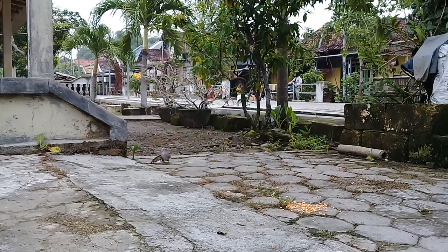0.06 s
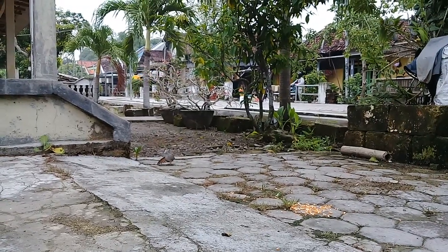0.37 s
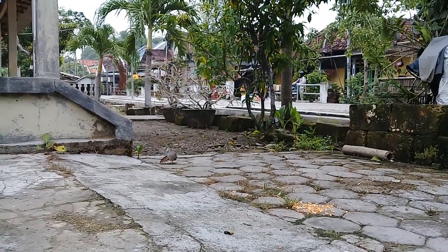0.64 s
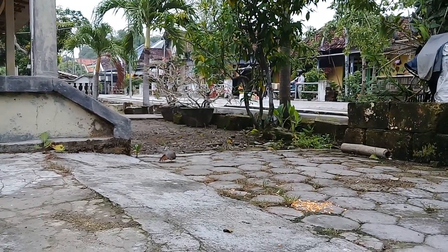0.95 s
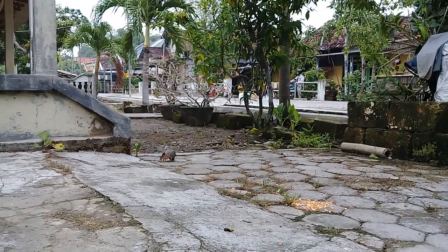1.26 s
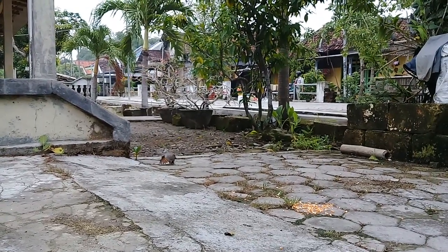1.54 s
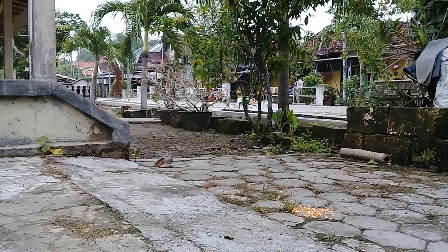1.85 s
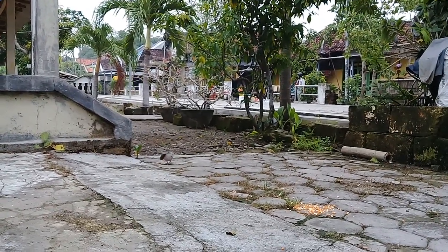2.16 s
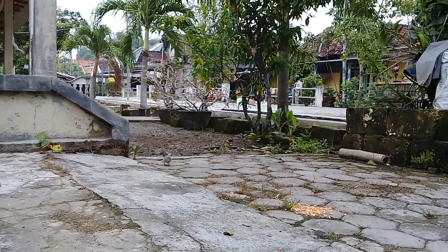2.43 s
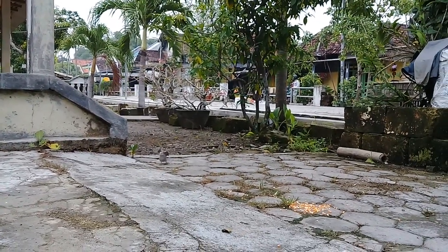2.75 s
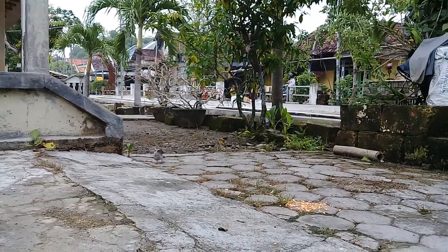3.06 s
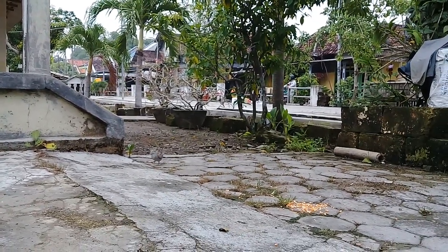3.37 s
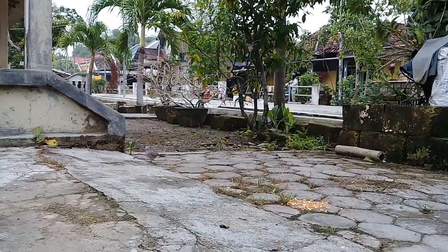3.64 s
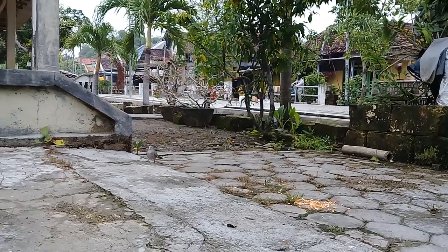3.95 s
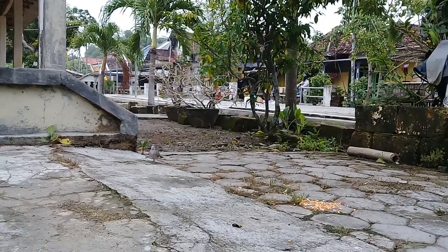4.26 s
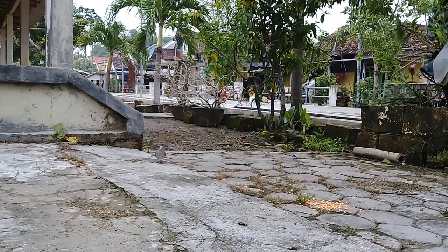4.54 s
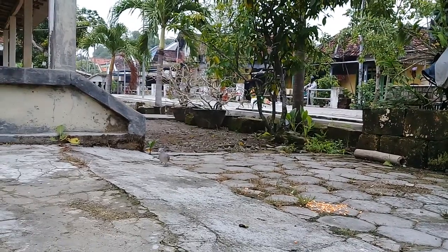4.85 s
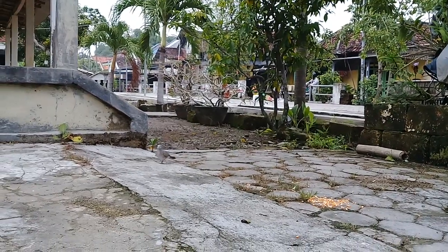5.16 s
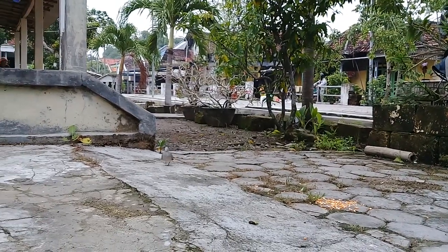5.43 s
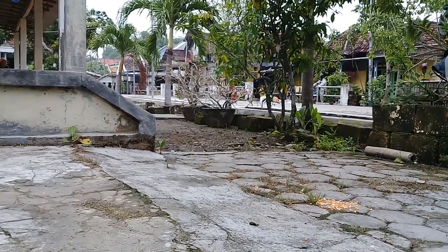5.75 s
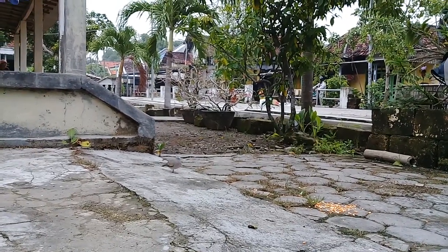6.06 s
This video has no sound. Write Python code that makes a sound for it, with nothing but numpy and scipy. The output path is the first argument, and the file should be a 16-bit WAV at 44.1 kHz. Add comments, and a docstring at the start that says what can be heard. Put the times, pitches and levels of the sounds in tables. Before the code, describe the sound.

A distant motorbike starts and throbs at idle beneath peeping chicks, dove coos, a small bird's chatter and a few dull scrubbing strokes.

```python
"""A village yard. From the start, chicks peep in falling glides over a low rumble and far birds and leaves.
A light knock sounds; after a second a single-cylinder motorbike starts some way off and idles, its
firings driving the silencer's resonance in a low throb. A zebra dove coos; then a small bird chatters
and friction excites a dull body in even scrubbing strokes. Near the end come thin whistles, the dove
again and rough warbles. Reflections from walls and paving give the calls and strokes a short echo."""
import sys
import numpy as np
from scipy import signal
from scipy.io import wavfile

SR = 44100
rng = np.random.default_rng(int(sys.argv[2]) if len(sys.argv) > 2 else 0)


def unload_wav(signal):
    """Save mono or channel-first audio to the path in sys.argv[1] as 16-bit WAV at rate SR, clipped to [-1, 1]."""
    wavfile.write(
        sys.argv[1],
        SR,
        np.round(np.clip(np.atleast_2d(signal).T, -1, 1) * 32767).astype(np.int16),
    )


N = 277830
TIME = np.arange(N) / SR


# Engine speed. Each row: time in seconds, firings per second.
FIRING_RATE = [(1.22, 13.22), (1.37, 16.88), (2.65, 17.51), (3.3, 16.99), (3.7, 17.64), (4.05, 16.95),
               (4.45, 17.44), (6.3, 17.78)]
# The silencer's response. Each row: frequency in Hz, gain in dB.
SILENCER_RESPONSE = [(52, -33), (69, -28), (84, -3), (99, -0.5), (108, 0), (120, -10.5), (139, -25),
                     (156, -18.5), (173, -30), (191, -19.5)]
# Mechanical noise. Each row: frequency in Hz, relative spectral density in dB.
ENGINE_SPECTRUM = [(70, 13), (120, 9.5), (180, -3.5), (300, -4), (480, -4.5), (780, -31), (1250, -18.5),
                   (1900, -17), (2400, -42.5), (3400, -12), (5500, -19), (7500, -59), (9000, -77),
                   (15000, -42.5)]
# Modes of the engine casing. Each row: frequency in Hz, bandwidth in Hz, relative level in dB.
CASING_MODES = [(587, 61.5, -62.5), (1014.5, 55, -71.5)]

def motorbike(boom_db=-44, noise_db=-54, casing_db=-0.5, first_firing_s=1.112, slow_idle_hz=16.86):
    """Forced resonance: harmonics of the firing rate boom in the silencer near 100 Hz; the casing rattles."""
    firing_hz, = in_time(FIRING_RATE)
    cycles = np.cumsum(firing_hz) / SR
    phase = 2 * np.pi * (cycles - np.interp(first_firing_s, TIME, cycles))
    exhaust = 0
    for order in range(4, 12):
        db = boom_db + np.interp(order * firing_hz, *np.transpose(SILENCER_RESPONSE))
        slip = 0
        if order == 5:  # this order makes the throb; it weakens as the engine speeds up
            db = db - 10 * np.maximum(firing_hz - slow_idle_hz, 0)
        elif order != 6:  # the weak orders waver in level and phase
            db = db + 0.8 * drift(5)
            slip = 0.3 * drift(5)
        exhaust = exhaust - np.sqrt(2) * from_db(db) * np.cos(order * phase + slip)
    rattle = from_db(noise_db) * coloured_noise(ENGINE_SPECTRUM, flicker_db=2.5)
    rattle += from_db(casing_db) * ringing_noise(CASING_MODES)
    unevenness = from_db(-0.35 * drift(21))
    puffs = 1 + 0.064 * np.cos(phase)
    return spin_up() * (exhaust * unevenness + rattle * puffs)


def spin_up(start_s=1.042, rise_s=0.37):
    """The engine's amplitude envelope: a linear rise from 0 at rest to 1 at idle."""
    return np.clip((TIME - start_s) / rise_s, 0, 1)


# Chicks near the house. Each row: start of the fall in seconds, its length in seconds,
# top pitch in Hz, relative level in dB.
CHICK_PEEPS = [(0.077, 0.11, 5770, -63), (0.084, 0.092, 4260, -74.5), (0.246, 0.034, 4300, -66),
               (0.392, 0.11, 5640, -59), (0.403, 0.031, 4200, -65), (0.546, 0.042, 5290, -56),
               (0.667, 0.12, 5620, -60.5), (0.964, 0.11, 5680, -59), (1.1, 0.057, 4700, -64.5),
               (1.272, 0.12, 5800, -60.5), (1.274, 0.029, 4370, -60), (1.456, 0.032, 4370, -56),
               (1.601, 0.09, 5650, -58), (1.962, 0.076, 5080, -56.5), (2.153, 0.08, 5060, -55),
               (2.749, 0.081, 5070, -55), (2.925, 0.087, 4850, -58.5), (3.425, 0.019, 3750, -54),
               (3.49, 0.048, 4070, -57.5), (3.664, 0.039, 4370, -52), (4.126, 0.027, 4380, -65),
               (4.383, 0.094, 5340, -56), (4.754, 0.029, 4100, -58), (5.121, 0.029, 4400, -63),
               (5.272, 0.026, 4300, -60.5), (5.462, 0.11, 5630, -63.5), (5.649, 0.053, 4750, -56),
               (5.835, 0.027, 4300, -53), (6.059, 0.107, 5650, -63)]

def chicks(level_db=-0.8, flare_hz=4050, flare_width_hz=220, ground_dip_hz=4550, echo_s=0.011):
    """Interference and resonance: falling peeps dip, then flare and ring at a resonance near 4 kHz."""
    peeps, echo = np.zeros((2, N))
    for s, length, top_hz, db in CHICK_PEEPS:
        note = from_db(db + level_db) * peep(length, top_hz)
        start = s - PEEP_HOLD * length
        add(peeps, start, note)
        paving_lag_s = rng.uniform(.0008, .003)  # the bounce off the paving ripples the glide
        add(peeps, start + paving_lag_s, 0.4 * note)
    flare = 1.16 * resonate(peeps, flare_hz, flare_width_hz)
    peeps = peeps + flare - resonate(peeps, ground_dip_hz, 400)
    ring = from_db(-8) * resonate(peeps, flare_hz, flare_width_hz)
    add(echo, echo_s, from_db(-13) * peeps + ring)
    return yard(peeps + echo, wet_db=-8)


PEEP_HOLD = 0.17  # time on the top note, as a share of the fall's length

def peep(length, top_hz, end_hz=2800, attack_share=0.44, swell_db=4.5, uneven_db=1.5):
    """A frequency glide: the tone holds its top note, then falls ever faster, swelling unevenly."""
    progress = np.arange(-PEEP_HOLD * length, length, 1 / SR) / length
    hz = top_hz - (top_hz - end_hz) * np.maximum(progress, 0) ** 1.42
    attack = np.clip((progress + PEEP_HOLD) / attack_share, 0, 1)
    release = np.clip((1 - progress) / (2.34 * length), 0, 1)  # long peeps fade higher up the glide
    fade = np.sin(np.pi / 2 * attack * release) ** 2
    uneven = np.interp(TIME[:len(hz)] * 60.5, np.arange(40), rng.standard_normal(40))
    return fade * from_db(swell_db * (progress - .5) + uneven_db * uneven) * voice(hz, waver=0.008)


# The dove's phrases. Each row: start in seconds, gain in dB.
DOVE_PHRASES = [(2.23, -1), (5.483, 1.5)]
# Downward flicks within the coo. Each row: delay into the phrase in seconds, relative level in dB.
DOVE_FLICKS = [(0.249, -58), (0.372, -60)]

def dove(pip_hz=902, pip_db=-55, coo_after_s=0.039):
    """Nearly pure tones reverberate among the houses: a low pip, then a held coo with two quick flicks."""
    pips, coos = np.zeros((2, N))
    for s, phrase_db in DOVE_PHRASES:
        gain = from_db(phrase_db)
        add(pips, s, gain * from_db(pip_db) * whistle(0.052, pip_hz, pip_hz, waver=0.017))
        add(coos, s + coo_after_s, gain * coo())
        for delay, db in DOVE_FLICKS:
            flick = whistle(0.0294, from_hz=1070, to_hz=864, waver=0.02)
            add(pips, s + delay, gain * from_db(db) * flick)
    return yard(pips, wet_db=-7) + yard(coos, wet_db=-2, t60_s=1.5)


def coo(length_s=0.5, start_hz=1180, sag_hz_per_s=270, flutter_hz=26.84, swell_db=11, fade_db_per_s=7.5):
    """Joint frequency and amplitude modulation: a sagging note, clear as it swells, then fluttering."""
    t = TIME[:int(length_s * SR)]
    swell = np.exp(-((t - 0.087) / 0.032) ** 2)
    flutter_rate = flutter_hz * (1 + 0.25 * drift(13)[:len(t)])
    flutter = (1 - swell) * np.sin(2 * np.pi * np.cumsum(flutter_rate) / SR)
    hz = (start_hz - sag_hz_per_s * t) * (1 + 0.041 * flutter)
    strength = from_db(-63 + swell_db * swell - fade_db_per_s * t) * (1 + 0.17 * flutter)
    return strength * signal.windows.tukey(len(t), .1) * voice(hz, waver=0.0079)


# Scrubbing strokes. Each row: start in seconds, length in seconds, level in dB.
SCRUB_STROKES = [(2.925, 0.14, -53), (3.609, 0.17, -51.5), (4.264, 0.2, -55), (4.996, 0.16, -50.5),
                 (5.687, 0.18, -52)]
# Modes of the scrubbed body. Each row: frequency in Hz, bandwidth in Hz, relative level in dB.
SCRUBBED_MODES = [(248, 24, 2), (281, 85, 2.5), (437, 210, 3), (970, 420, -10.5)]

def scrubbing(grain_db=1.25):
    """Frictional excitation: each stroke grips unevenly and drives the modes of a dull body."""
    force = bursts(SCRUB_STROKES, taper=0.59) * from_db(grain_db * drift(55))
    return yard(force * rms_one(ringing_noise(SCRUBBED_MODES)), wet_db=-4)


# The two tones of a chip. Each row: starting pitch in Hz, final pitch in Hz, relative level in dB.
CHIP_GLIDES = [(5330, 5150, -5.5), (4320, 3500, 1.5)]

def chatter(start_s=2.832, count=22, gap_s=0.0614, slowing_s=0.00164, rasp_db=-61.5, chip_db=-65):
    """Tone plus noise: a small bird's slowing run of chips, each two sinking glides and a pulse of rasp."""
    rasp_envelope, chips = np.zeros((2, N))
    age = TIME[:SR // 10] / 0.0068  # the rasp peaks at age 1
    s = start_s
    for k, uneven_db in enumerate(rng.standard_normal(count)):
        add(rasp_envelope, s, from_db(rasp_db + uneven_db) * age * np.exp(1 - age))
        for from_hz, to_hz, tone_db in CHIP_GLIDES:
            tone = whistle(0.0203, from_hz, to_hz, waver=0.018)
            add(chips, s, from_db(chip_db + uneven_db + tone_db) * tone)
        s += gap_s + slowing_s * k
    rasp = ringing_noise([(3990, 220, 1.0), (5230, 750, -0.5), (7240, 170, -15.5)])
    return yard(rasp_envelope * rasp + chips, wet_db=-8)


# Throaty notes. Each row: start in seconds, length in seconds, centre pitch in Hz, relative level in dB.
WARBLE_NOTES = [(0.636, 0.073, 4204, -62.5), (2.868, 0.018, 3610, -55), (6.107, 0.11, 3006, -60.5),
                (6.221, 0.066, 3020, -51.5)]

def warbles(level_db=-1, swing_hz=19, swing_depth=0.0884):
    """Frequency modulation: a fast swing about a centre pitch roughens the notes of birds further off."""
    notes = np.zeros(N)
    for s, length, centre_hz, db in WARBLE_NOTES:
        t = TIME[:int(length * SR)]
        hz = centre_hz * (1 + swing_depth * np.cos(2 * np.pi * swing_hz * t))
        add(notes, s, from_db(db + level_db) * signal.windows.tukey(len(t), .4) * voice(hz, waver=0.0536))
    return yard(notes, wet_db=0)


# Thin whistles. Each row: start in seconds, length in seconds, level in dB.
HIGH_NOTES = [(5.044, 0.085, -73), (5.673, 0.1, -67.5), (6.199, 0.09, -65.5)]

def high_whistles(top_hz=5650, drop_hz=620):
    """Parabolic glides: each thin note lingers near its top pitch, then bends down a little."""
    notes = np.zeros(N)
    for s, length, db in HIGH_NOTES:
        hz = top_hz - drop_hz * np.linspace(0, 1, int(length * SR)) ** 2
        add(notes, s, from_db(db) * signal.windows.tukey(len(hz), .5) * voice(hz, waver=0.011))
    return yard(notes, wet_db=-5)


# The impact. Each row: start in seconds, relative peak level in dB.
IMPACTS = [(.459, -49.5)]
# Modes of the struck body. Each row: frequency in Hz, bandwidth in Hz, relative level in dB.
STRUCK_MODES = [(530, 134, -2.5), (740, 180, -20), (1140, 590, -22), (1650, 220, -15.5), (1910, 350, -18)]

def knock(attack_s=0.0012, t60_s=0.12):
    """Damped vibration: after a light knock across the yard, broad modes decay exponentially."""
    envelope, t = np.zeros(N), TIME[:SR // 2]
    for s, peak_db in IMPACTS:
        add(envelope, s, from_db(peak_db - 60 * t / t60_s) * np.minimum(t / attack_s, 1))
    return yard(envelope * ringing_noise(STRUCK_MODES), wet_db=-4)


def high_fizz(level_db=-81, swell_db=3, lag_s=0.25):
    """Band-limited noise: a thin fizz near 7 kHz sets in just after the engine, and swells and ebbs."""
    band_pass = signal.butter(6, [6700, 7950], "band", fs=SR, output="sos")
    fizz = rms_one(signal.sosfilt(band_pass, rng.standard_normal(N)))
    onset = np.interp(TIME - lag_s, TIME, spin_up())
    return fizz * from_db(level_db + swell_db * drift(0.4)) * onset


# Spectra of the village air, the trees and a rustle.
# Each row: frequency in Hz, relative spectral density in dB.
AIR_SPECTRUM = [(25, -21), (50, -8.5), (85, 2), (150, -4.5), (250, -10.5), (500, -27.5), (900, -31.5),
                (2400, -37), (7000, -50.5), (15500, -50)]
TREES_SPECTRUM = [(2300, -63), (2900, -5), (3500, 6), (4100, 9), (4650, -1), (5400, -1.5), (6400, -43)]
RUSTLE_SPECTRUM = [(800, 6), (1200, 9.5), (2100, -1), (3000, 5), (6000, -6), (11000, -37)]
# The wash from the trees. Each row: time in seconds, relative level in dB.
TREES_LEVEL = [(0, -63), (.33, -74.5), (.65, -60), (1.35, -74), (2.3, -66), (3.7, -60), (4.6, -60.5),
               (6.3, -66.5)]
# The rustle. Each row: start in seconds, length in seconds, level in dB.
RUSTLE_BURSTS = [(2.677, 0.556, -61)]

def surroundings(air_db=-57, rise_db=2.5, rise_s=2.2, trees_db=-3.5):
    """Incoherent sources merge into noise: village rumble, far birds and leaves, one soft rustle."""
    air_gain = from_db(air_db + rise_db * np.minimum(TIME / rise_s, 1))
    air = air_gain * coloured_noise(AIR_SPECTRUM, flicker_db=3)
    trees = from_db(in_time(TREES_LEVEL)[0] + trees_db) * coloured_noise(TREES_SPECTRUM, flicker_db=5)
    rustle = bursts(RUSTLE_BURSTS, taper=0.6) * coloured_noise(RUSTLE_SPECTRUM, flicker_db=1.5)
    return air + trees + rustle


def yard(x, wet_db, t60_s=0.69):
    """Reverberation: scattered reflections from walls, trunks and paving follow the direct sound."""
    t = TIME[:SR]
    reflections = rng.standard_normal(SR) * (rng.random(SR) < 1500 / SR)  # about 1500 a second
    response = reflections * (t > .006) * from_db(-60 * t / t60_s)
    return x + from_db(wet_db) * signal.fftconvolve(x, response / np.linalg.norm(response))[:N]


def whistle(length, from_hz, to_hz, waver):
    """A linear glide that fades in and out."""
    hz = np.linspace(from_hz, to_hz, int(length * SR))
    return signal.windows.tukey(len(hz), 0.45) * voice(hz, waver)


def voice(hz, waver):
    """Jitter and shimmer: a bird's pure tone wavers in pitch and strength along its path; rms about 1."""
    knots_s = np.arange(300) / 330
    jitter, shimmer = [np.interp(TIME[:len(hz)], knots_s, row) for row in rng.standard_normal((2, 300))]
    phase = 2 * np.pi * np.cumsum(hz * (1 + waver * jitter)) / SR
    return np.sqrt(2) * from_db(2 * shimmer) * np.sin(phase)


def resonate(x, hz, width_hz):
    """A two-pole resonator with unit gain at its peak."""
    r = np.exp(-np.pi * width_hz / SR)
    feedback = [1, -2 * r * np.cos(2 * np.pi * hz / SR), r * r]
    return signal.lfilter(np.array([1, 0, -1]) * (1 - r * r) / 2, feedback, x + 1e-18)


def ringing_noise(modes):
    """Random excitation of modes, each given as frequency in Hz, bandwidth in Hz and rms level in dB."""
    total = 0
    for hz, width, db in modes:
        once = resonate(rng.standard_normal(N), hz, 1.5 * width)
        total = total + from_db(db) * rms_one(resonate(once, hz, 1.5 * width))  # twice, for steep skirts
    return total


def coloured_noise(spectrum, flicker_db):
    """Spectral shaping: noise in third-octave bands, each flickering on its own; rms 1."""
    edges = 22 * 2 ** (np.arange(30) / 3)
    hz, density_db = np.transpose(spectrum)
    white, total = rng.standard_normal((2, N)), 0
    for k, (low, high) in enumerate(zip(edges, edges[1:])):
        if high > hz[0] and low < hz[-1]:
            db = np.interp(np.log(low * high) / 2, np.log(hz), density_db)
            band_pass = signal.butter(2, [low, high], "band", fs=SR, output="sos")
            band = signal.sosfilt(band_pass, white[k % 2])
            total = total + band * from_db(db + flicker_db * drift(8.6))
    return rms_one(total)


def drift(rate_hz, step=40, settle=2000):
    """Low-passed noise: a slow random fluctuation of rms 1."""
    r = np.exp(-2 * step * np.pi * rate_hz / SR)
    white = rng.standard_normal(N // step + settle + 2)
    slow = signal.lfilter([1], [1, -2 * r, r * r], white)[settle:]
    return np.interp(np.arange(N) / step, np.arange(len(slow)), rms_one(slow))


def bursts(rows, taper):
    """An envelope of soft-edged pulses, one for each row of start, length and level."""
    envelope = np.zeros(N)
    for s, length, db in rows:
        add(envelope, s, from_db(db) * signal.windows.tukey(int(length * SR), taper))
    return envelope


def in_time(rows):
    """Linear interpolation in time, one curve per value column."""
    s, *columns = np.transpose(rows)
    return [np.interp(TIME, s, column) for column in columns]


def add(track, s, sound):
    """Superpose a sound on a track, starting at s seconds."""
    start = int(np.clip(s * SR, 0, N))
    track[start:start + len(sound)] += sound[:N - start]


def from_db(db):
    """Decibels to amplitude ratio."""
    return 10 ** (np.asarray(db) / 20)


def rms_one(x):
    """Normalise to rms 1."""
    return x / np.sqrt(np.mean(x ** 2) + 1e-20)


def scene():
    """Superposition: all sources add equally in both channels, so they are heard in the middle."""
    engine = motorbike() + high_fizz()
    birds = chicks() + dove() + chatter() + warbles() + high_whistles()
    middle = engine + birds + scrubbing() + knock() + surroundings()
    return np.array([middle, middle])


def record(dry, hiss_db=-77, hiss_hz=5200, cutoff_hz=15750):
    """Noise floor and band limit: each channel gains its own faint, bright hiss; the top is cut steeply."""
    high_pass = signal.butter(2, hiss_hz, "high", fs=SR, output="sos")
    hiss = signal.sosfilt(high_pass, rng.standard_normal((2, N)))
    low_pass = signal.ellip(12, .1, 80, cutoff_hz, fs=SR, output="sos")
    return signal.sosfilt(low_pass, dry + from_db(hiss_db) * hiss)


dry = scene()
out = record(dry)
unload_wav(out)
```